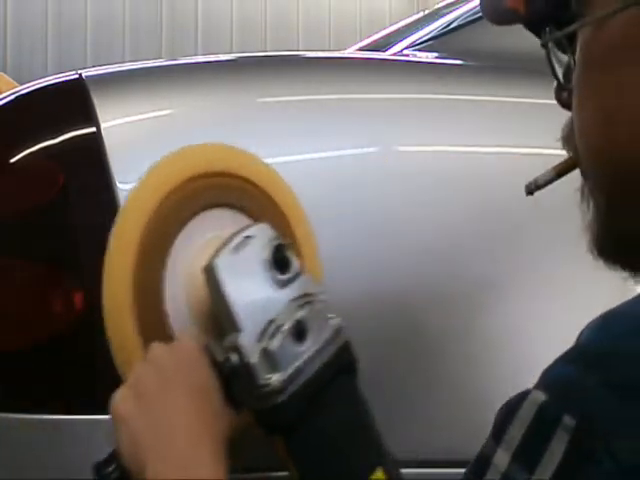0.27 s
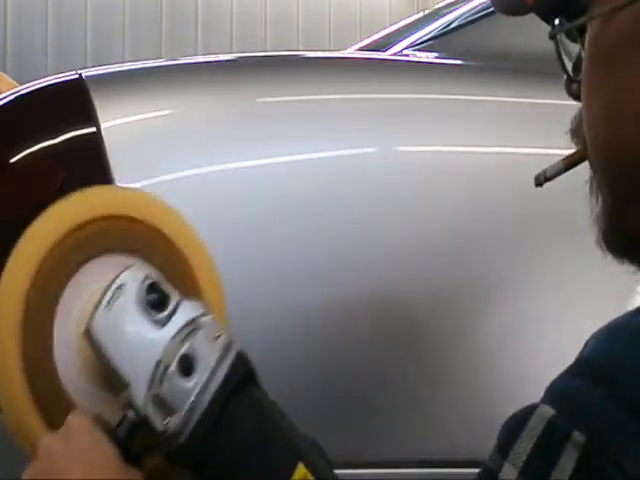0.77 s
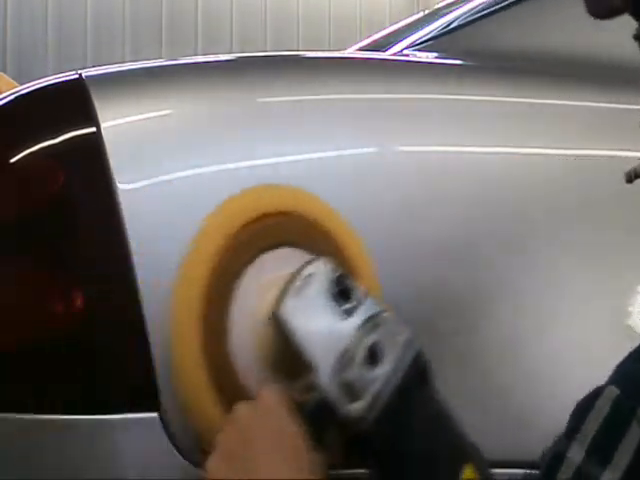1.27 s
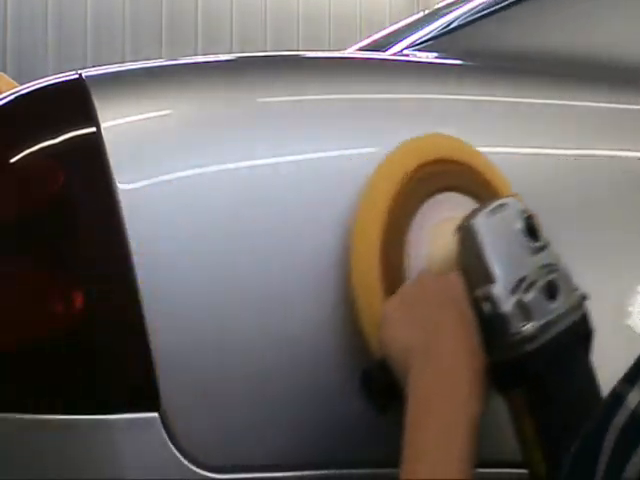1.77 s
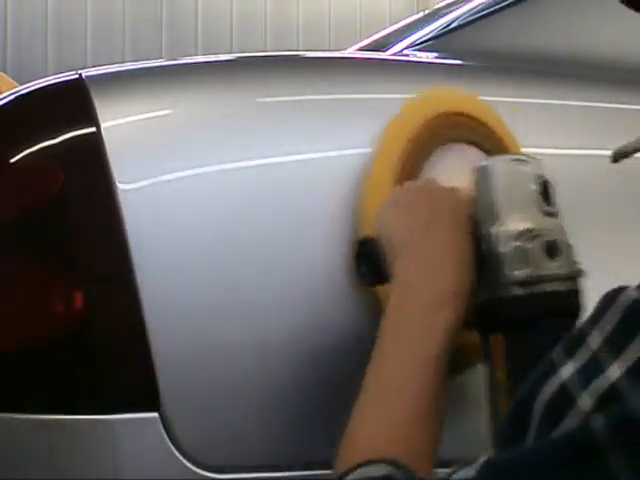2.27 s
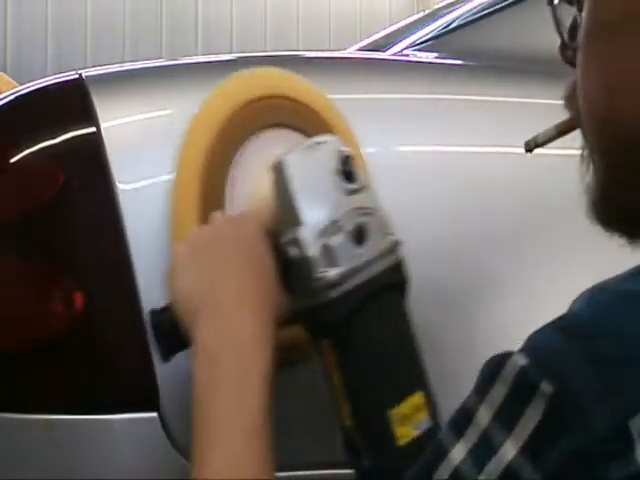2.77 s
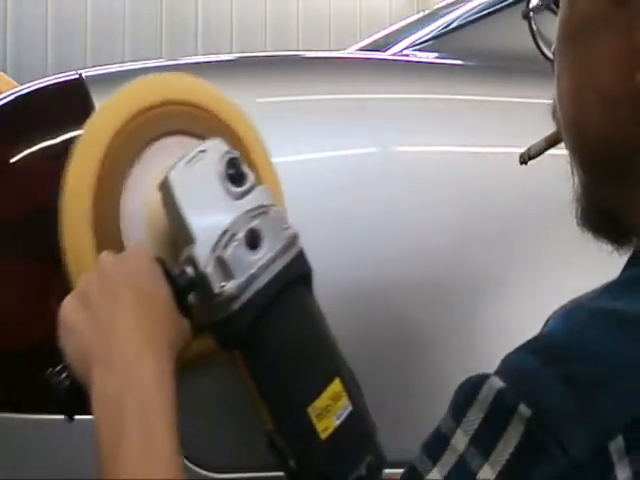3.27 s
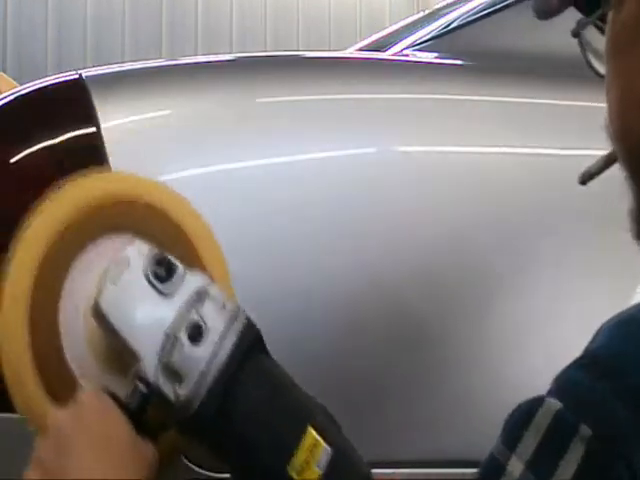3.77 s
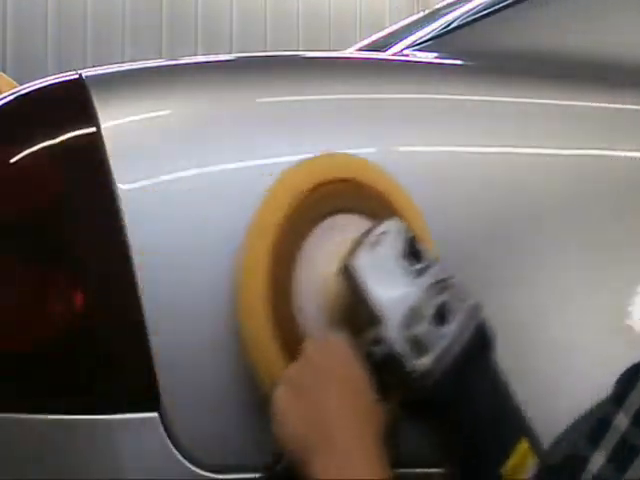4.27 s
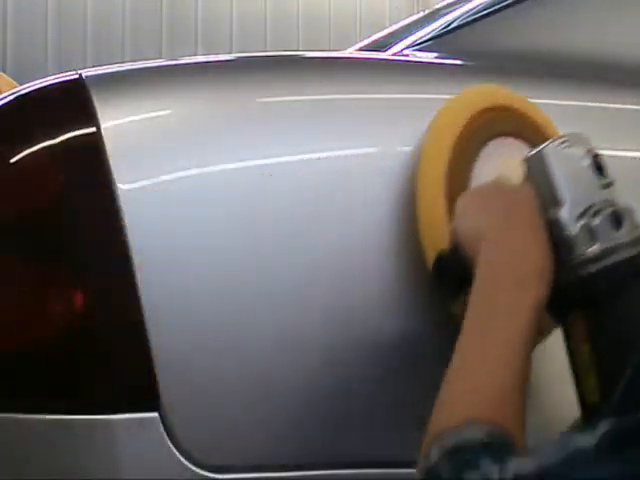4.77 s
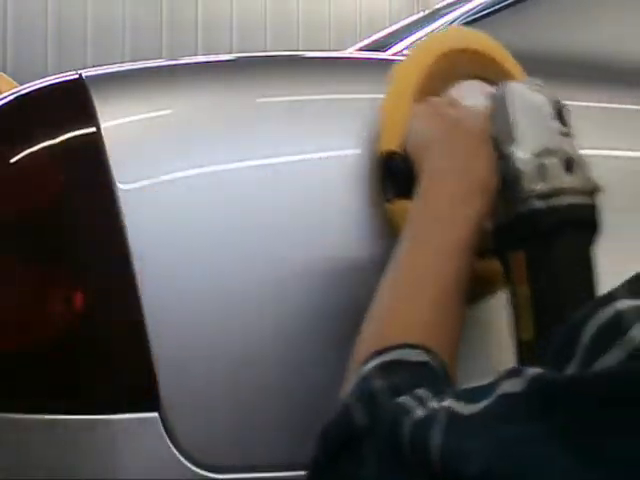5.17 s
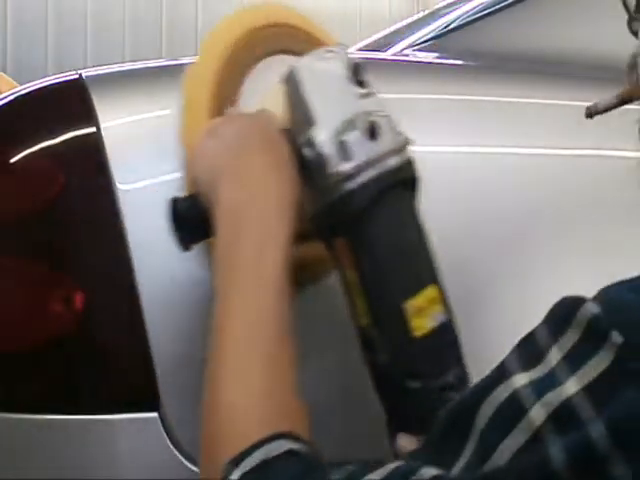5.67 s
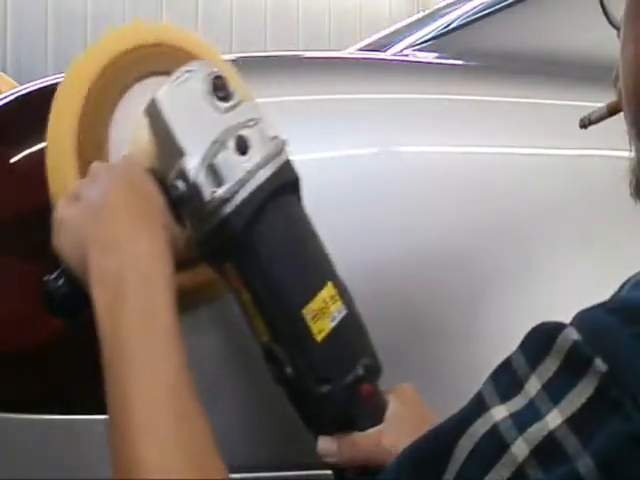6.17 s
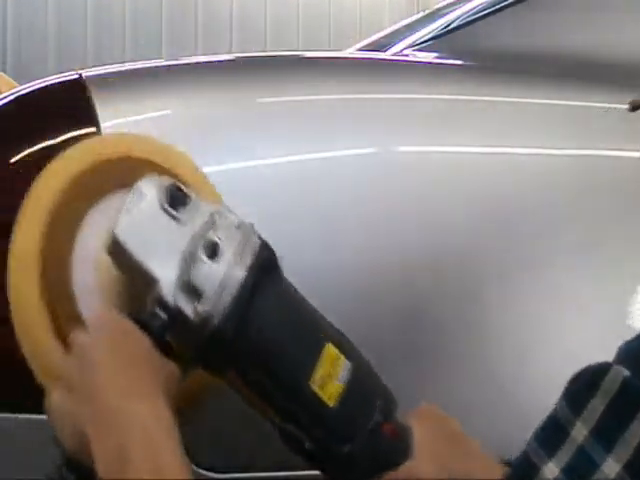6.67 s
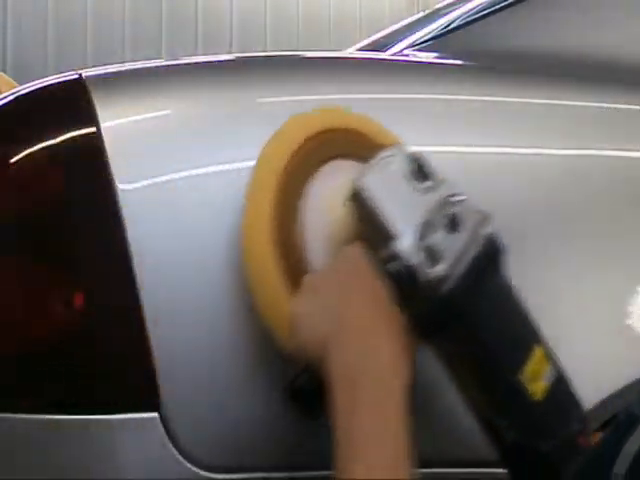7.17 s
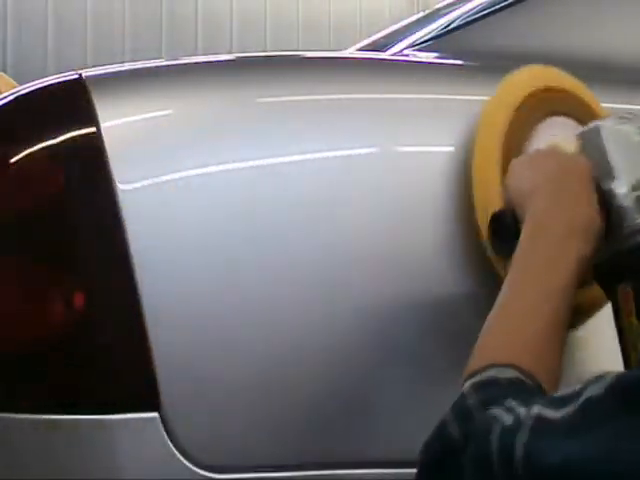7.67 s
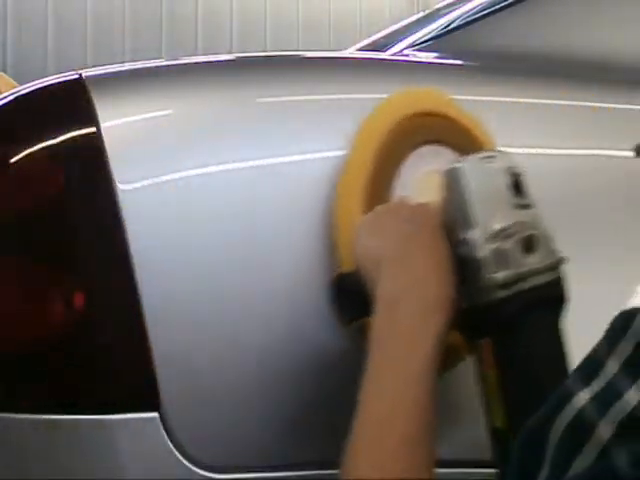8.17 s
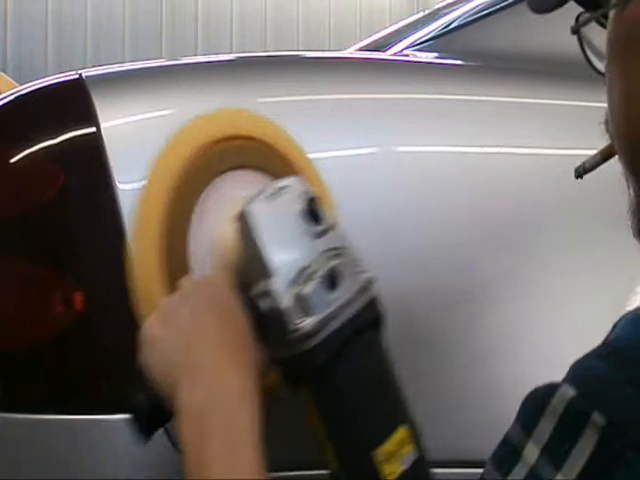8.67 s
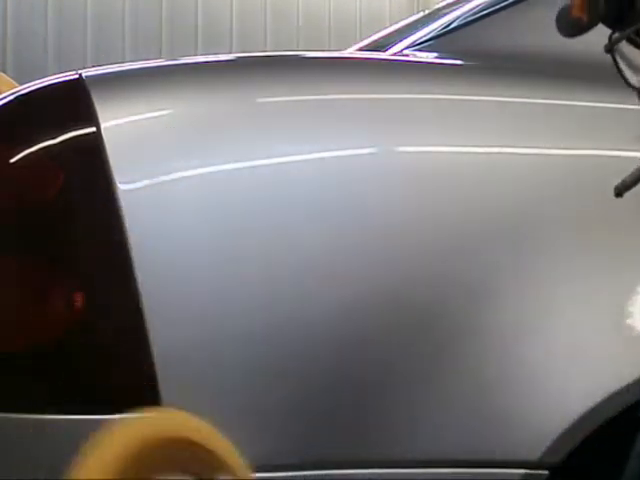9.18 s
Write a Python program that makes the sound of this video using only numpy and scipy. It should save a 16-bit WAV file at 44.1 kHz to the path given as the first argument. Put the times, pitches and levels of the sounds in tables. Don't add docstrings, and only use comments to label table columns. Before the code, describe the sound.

A power polisher buzzes continuously near the microphone: a piercing, slightly gritty whine with higher overtones, a fast rattling gear flutter, airy fan rush and low pad rumble. Sweeping motions shift its tone and loudness gently, with brief flares from the garage's reflections. After about nine seconds power is cut and the motor tone drops away, still spinning as the sound ends.

```python
import sys
import numpy as np
from scipy import signal
from scipy.fft import rfft, irfft, next_fast_len
from scipy.io import wavfile
from scipy.ndimage import uniform_filter1d, map_coordinates

SR = 44100
rng = np.random.default_rng(int(sys.argv[2]) if len(sys.argv) > 2 else 0)


def linear_from_db(decibels):
    return 10 ** (np.asarray(decibels, float) / 20)


def output_pcm(signal):
    pcm = np.clip(np.atleast_2d(signal).T, -1, 1) * 32767
    wavfile.write(sys.argv[1], SR, np.round(pcm).astype(np.int16))


N = 415863

PINION_TEETH, CROWN_TEETH = 6, 53
MESH_ORDERS = (1, 2, 3, 4, 6, 5)
SWITCH_OFF_S = 8.97
USUAL_MESH_HZ, SPEED_SPAN_HZ = 1265, 50
DRAG_HZ_PER_S, SLACK_HZ, SLACK_S = 460, 56, 0.08

# (time [s], tooth mesh [Hz])
LOADED_SPEED = [(0, 1278), (.62, 1268), (1.25, 1283), (1.5, 1305), (2.12, 1313), (2.5, 1281), (3.25, 1241),
                (3.88, 1255), (4.38, 1279), (5.12, 1292), (5.5, 1238), (6.3, 1204), (7.0, 1236),
                (7.4, 1276), (7.85, 1318), (8.25, 1277), (8.75, 1238), (8.95, 1247)]
# (time [s], head turned away [0-1], nearness [dB], pad lean [0-1], head resonance [Hz])
HANDS = [(0, 0.1, 0.7, 0.74, 2380), (.9, .2, 0.65, 0.1, 2520), (1.3, 0.1, -0.2, 0.48, 2700),
         (1.7, 0.63, -1.4, .6, 2600), (2.25, 0.8, 0.6, 0.79, 2710), (2.6, 0.12, 0.5, .95, 2400),
         (3.5, 0.26, 0.8, .05, 2320), (4.2, 0.21, .6, 0.48, 2700), (4.75, 1, -.6, 0.9, 2610),
         (5.1, 0.7, 1.1, 0.88, 2490), (5.7, 0.12, -1.1, .5, 2270), (6.4, 0.18, -1.5, .1, 2170),
         (7.0, 0.28, -.4, .05, 2620), (7.3, 0.2, -0.1, 0.53, 2700), (7.75, 1.1, 0.1, 0.68, 2620),
         (8.3, 0.17, 1.5, 0.91, 2500), (8.9, 0.09, 0.3, 0.32, 2521), (9.43, 0.5, -1.3, .4, 2430)]
# (level [dB], [dB per speed span], turned away [dB], switch opening [dB], coasting [dB per s])
MESH_LEVELS = [
    (-30, -0.2, -8.5, -10, 4),
    (-31.5, -1.7, -0.4, 7.5, -12),
    (-39, 5, -2.5, -9, 6),
    (-41.5, -0.5, -11.5, -5, 20),
    (-44, -0.5, 3.8, -4, 20),
    (-44, -1, 6.5, 1.5, -14),
]
# (time [s], mesh
# order, rise [dB], length [s])
MESH_FLARES = [(.48, 1, 4, 0.082), (2.75, 1, 3.5, .3), (2.43, 1, 6.5, .06), (5.39, 2, 5, .08),
               (5.555, 1, 6, 0.11), (6.3, 1, 4, .35), (8.38, 1, 1.5, 0.11), (.5, 2, 1, 0.11),
               (.96, 2, 3, 0.099), (1.42, 2, 6, 0.11), (1.88, 2, 7, 0.056), (2.24, 2, 11, 0.18),
               (2.89, 2, 6, .08), (4.15, 2, 9, .11), (4.75, 2, 10, .07), (5.046, 2, 6.5, 0.096),
               (5.62, 2, 11, .27), (6.1, 2, 7.5, 0.16), (6.751, 2, 4, 0.33), (7.75, 2, 4.5, 0.077),
               (8.297, 2, 7, .13), (9.32, 2, 4, .04), (.35, 3, 3, 0.23), (1.0, 3, 5.5, 0.22),
               (4.83, 3, 6, .12), (3.35, 4, 10, 0.99), (7.0, 4, 9, 0.41), (8.62, 4, 5, .28),
               (9.15, 6, 8, .045), (9.36, 6, 12.5, .055)]
# (mesh order, level [dB])
MINOR_MESH = [(7, -54), (8, -56), (9, -65), (10, -60), (11, -57), (12, -57)]
# (turn order, level [dB])
SHAFT_TONES = [(2, -55), (7, -54), (10, -37.5), (11, -46), (26, -50), (35, -67), (53, -59)]
# (crown order, level under first mesh order [dB], [dB per speed span])
CROWN_BEATS = [(52, -7, -5), (51, -8.5, 1.5), (50, -10.5, 5), (35, -11.5, .3), (34, -11.5, 3.5),
               (33, -14, .3)]
# (frequency [Hz], density [dB per Hz])
HOUSING_COLOUR = [(250, -29), (500, -11), (850, -7), (1240, -6.5), (1420, -17.5), (1800, -10.5), (2400, -6),
                  (3150, -10.5), (3950, -9), (4580, -15), (5090, -11.5), (7600, -18.5), (8300, -34.5),
                  (11000, -43)]
# (frequency [Hz], density [dB per Hz])
BRUSH_COLOUR = [(7000, -24), (8300, 0), (10300, -3.5), (11300, -2.5), (13100, -5.5), (13900, 2),
                (15000, -0.5), (15750, 0)]
# (frequency [Hz], width [Hz], level [dB])
KNOCK_MODES = [(816, 270, -9.5), (1144, 68, 1), (2006, 110, -1)]
ZONE_HZ = [750, 2400, 5200, 11500, 14000]
# (level [dB per speed span], turned away [dB], coasting [dB])
ZONE_SWELLS = [
    (1.7, 1.5, 2.5),
    (0.8, -5, -3.5),
    (0.9, 3.5, -1.8),
    (1, -2, 1.5),
    (-0.5, -6, 3.5),
]
# (frequency [Hz], [Hz per speed span], turned away [Hz], depth [dB], width [Hz])
PAINT_DIP = (12750, -170, -450, 6.3, 330)
# (mesh order, level [dB])
BRUSH_RIDGES = [(11, 4.5), (12, 3)]
# (frequency [Hz], density [dB per Hz])
FOAM_COLOUR = [(15, -41), (25, -14), (32, -30), (80, -2), (118, -7), (162, -8), (205, -1.5), (275, -2.5),
               (330, -3), (430, -8), (730, -120)]
# (frequency [Hz], level [dB])
COIL_HUM = [(120, -53.5), (240, -49)]
# (time [s], low edge [Hz], high edge [Hz], level [dB])
SIDE_BURSTS = [(0.398, 5600.0, 6980.0, -35.0), (1.445, 10940.0, 12490.0, -46.5),
               (1.837, 4490, 5770.0, -36.0), (1.837, 8870.0, 10340.0, -45.0), (2.0, 4050.0, 5190, -33.0),
               (2.212, 12900, 14630, -47.0), (2.696, 7480, 9810, -41.0), (3.37, 5130, 6360, -34.0),
               (3.393, 12320.0, 13870.0, -46.0), (3.532, 4486, 5870, -32.0), (4.066, 4135, 5350, -34.0),
               (4.066, 6120.0, 7600, -36.0), (4.438, 6780, 8380, -40.0), (4.45, 12200, 15250.0, -42.0),
               (4.717, 4190, 5346, -33), (4.717, 12320.0, 13900, -47.0), (5.3, 9640, 11000, -44),
               (5.3, 11600, 13180.0, -47.0), (5.37, 9560.0, 11110.0, -46.0),
               (5.413, 10940.0, 12490.0, -47.0), (7.944, 13810, 15930.0, -44.0),
               (8.943, 10980, 13180.0, -43.0), (8.943, 13800, 15250.0, -37.0)]


def unit(x):
    return x / np.sqrt(np.mean(x ** 2) + 1e-20)


def curves(rows):
    s, *cols = np.transpose(rows)
    return [np.interp(np.arange(N) / SR, s, c) for c in cols]


def wobble(rate):
    at = np.arange(0, N + 32, 32)
    knots = rng.standard_normal(int(N * rate / SR) + 4)
    return np.interp(np.arange(N), at, map_coordinates(knots, [at * rate / SR]))


def coloured(x, spectrum):
    m = next_fast_len(N + 8192)
    hz, db = np.transpose(spectrum)
    log_hz = np.log(np.fft.rfftfreq(m, 1 / SR) + 1)
    gain = linear_from_db(np.interp(log_hz, np.log(hz), db, left=-120, right=-120))
    return unit(irfft(rfft(x, m) * gain, m)[:N])


def flaws(turns, count, fall_db, drift):
    size = 1 << 15
    k = np.arange(1, count + 1)
    spectra = np.zeros((3, size // 2 + 1), complex)
    random = rng.standard_normal((3, count)) + 1j * rng.standard_normal((3, count))
    spectra[:, k] = linear_from_db(-fall_db * np.log2(k)) * random
    at = (turns % 1 * size).astype(int)
    out = np.zeros(N)
    for i, wave in enumerate(irfft(spectra)):
        out += ((i == 0) + drift * wobble(1.515)) * wave[at]
    return unit(out)


def power():
    return 1 / (1 + np.exp(np.clip((np.arange(N) / SR - SWITCH_OFF_S) / 0.01, -50, 50)))


def speed():
    coast_s = np.clip(np.arange(N) / SR - LOADED_SPEED[-1][0], 0, None)
    slack_hz = SLACK_HZ * (1 - np.exp(-coast_s / SLACK_S))
    return curves(LOADED_SPEED)[0] - DRAG_HZ_PER_S * coast_s - slack_hz


def ease():
    return (curves(LOADED_SPEED)[0] - USUAL_MESH_HZ) / SPEED_SPAN_HZ


def mesh_levels(turned):
    t = np.arange(N) / SR
    levels_db = {}
    for order, (db, fast_db, away_db, off_db, coast_db) in zip(MESH_ORDERS, MESH_LEVELS):
        coasting_db = off_db + coast_db * (t - SWITCH_OFF_S) + 2.5 * wobble(24)
        running_db = db + fast_db * ease() + away_db * turned + 1.78 * wobble(7)
        levels_db[order] = running_db + (1 - power()) * coasting_db
    for s, order, db, length_s in MESH_FLARES:
        near = slice(max(round((s - 3 * length_s) * SR), 0), round((s + 3 * length_s) * SR))
        levels_db[order][near] += db * np.exp(-((t[near] - s) / length_s) ** 2)
    return list(levels_db.values())


def whine(teeth, levels_db):
    load = 0.57 + 0.34 * power()
    turns = teeth / CROWN_TEETH
    phase = 2 * np.pi * teeth
    play = 0.024 * wobble(60) + 0.089 * wobble(12)
    swings = [0.34, 0.36, 0.73, 0.45, 0.57, 0.5]
    slips = [0.25, 0.38, 0.5, 0.59, 0.3, 0.53]
    out = np.zeros(N)
    for order, db, swing, slip in zip(MESH_ORDERS, levels_db, swings, slips):
        size = 1.5 + swing * load * flaws(turns, count=12, fall_db=3.0, drift=0.83)
        size += 0.29 / order * power() * np.cos(2 * np.pi * turns - 1)
        lag = slip * load * flaws(turns, count=12, fall_db=7.0, drift=0.65)
        out += linear_from_db(db + 1.5) * size * np.sin(order * (phase + load * play) + lag)
    slack_db = -9 * (1 - power())
    for tones, per in ((MINOR_MESH, 1), (SHAFT_TONES, PINION_TEETH)):
        for order, db in tones:
            level = linear_from_db(db + 4.5 + slack_db + 4.1 * wobble(4))
            out += level * np.sin(order / per * (phase + play) + 0.7 * wobble(45))
    return out


def beats(teeth, first_db):
    fast = ease()
    out = np.zeros(N)
    for order, db, fast_db in CROWN_BEATS:
        out += linear_from_db(db + fast_db * fast) * np.sin(order / CROWN_TEETH * 2 * np.pi * teeth)
    return linear_from_db(first_db + 3.5 + 1.5 * wobble(3.02)) * power() * out


def grind(teeth):
    pinion_turns, crown_turns = teeth / PINION_TEETH, teeth / CROWN_TEETH
    mains = np.sin(2 * np.pi * COIL_HUM[0][0] * np.arange(N) / SR) * power()
    turn = flaws(crown_turns, count=8, fall_db=1.5, drift=0.31)
    air = (1 + 0.045 * mains + 0.051 * turn) * rng.standard_normal(N)
    pinion = flaws(pinion_turns, count=48, fall_db=0, drift=1.7)
    crown = flaws(crown_turns, count=125, fall_db=-2.0, drift=0.8) * (0.29 + 0.74 * power())
    body = linear_from_db(-19.5) * coloured(air + 0.06 * pinion + 0.2 * crown, HOUSING_COLOUR)
    shake = 1 + 0.05 * mains + 0.069 * np.sin(2 * np.pi * pinion_turns)
    sparks = shake * rng.standard_normal(N)
    bars = 0.22 + 0.6 * (1 - power())
    sparks += bars * flaws(pinion_turns, count=100, fall_db=1.5, drift=1.7)
    return body + linear_from_db(-35.5) * coloured(sparks, BRUSH_COLOUR)


def knock(teeth, mesh_hz, turned, lean):
    turns = teeth / CROWN_TEETH
    blows = np.diff(np.floor(turns), prepend=0)
    rattle = 0.022 * np.exp(1.6 * (np.cos(2 * np.pi * turns - 1) - 1)) * rng.standard_normal(N)
    force_db = 17 - 0.05 * (mesh_hz - 1260) - 8 * turned + 8 * lean + 1.5 * wobble(4)
    force = (1.9 * blows + rattle) * linear_from_db(force_db) * power()
    m = next_fast_len(N + 8192)
    f = np.fft.rfftfreq(m, 1 / SR)
    modes = np.zeros(len(f), complex)
    for k, (hz, wide_hz, db) in enumerate(KNOCK_MODES):
        damping = 1j * f * wide_hz
        modes += (-1) ** k * linear_from_db(db) * damping / (hz * hz - f * f + damping)
    greased = 1 / (1 + 1j * f / 2500) ** 2
    late = np.exp(1j * np.pi * 2.2e-5 * np.clip(1302 - f, 0, None) ** 2)
    return irfft(rfft(force, m) * modes * late * greased, m)[:N]


def facing(x, mesh_hz, turned, near_db, head_hz, patchy_db):
    hz, t, z = signal.stft(x, SR, nperseg=512)
    at = np.minimum((t * SR).astype(int), N - 1)
    fast, away, on = ease()[at], turned[at], power()[at]

    def bump(centre_hz, wide_hz):
        return np.exp(-((hz[:, None] - centre_hz) / wide_hz) ** 2)

    zones_db = np.array(ZONE_SWELLS) @ [fast, away - away.mean(), 1 - on] + near_db[at]
    share = np.array([np.interp(np.log(hz + 1), np.log(ZONE_HZ), row) for row in np.eye(len(ZONE_SWELLS))])
    patches = uniform_filter1d(uniform_filter1d(rng.standard_normal(z.shape), 5, 0), 40, 1)
    shape_db = 5.3 * on * bump(head_hz[at], 215)
    dip_hz, fast_hz, away_hz, dip_db, wide_hz = PAINT_DIP
    shape_db -= dip_db * bump(dip_hz + fast_hz * fast + away_hz * away, wide_hz)
    for order, db in BRUSH_RIDGES:
        shape_db += db * (1 - away) * bump(order * mesh_hz[at], 220)
    gain = linear_from_db(share.T @ zones_db + shape_db + patchy_db * unit(patches))
    return signal.istft(z * gain, SR, nperseg=512)[1][:N]


def pad(teeth, turned, lean):
    t = np.arange(N) / SR
    rumble_db = -49.5 + 2 * turned
    rumble = linear_from_db(rumble_db + 6.5 + 2.1 * wobble(2.91)) * coloured(rng.standard_normal(N), FOAM_COLOUR)
    unbalance_db = -59.5 + 19.5 * lean
    shaft = linear_from_db(unbalance_db + 2.0 + 2.5 * wobble(5)) * np.sin(2 * np.pi * teeth / PINION_TEETH)
    hum = np.zeros(N)
    for hz, db in COIL_HUM:
        hum += linear_from_db(db + 1 + 3.0 * wobble(2.28)) * np.sin(2 * np.pi * hz * t)
    return rumble + shaft + hum * power()


def side_bursts():
    side, size = np.zeros(N + SR), 2048
    f = np.fft.rfftfreq(size, 1 / SR)
    for s, low_hz, high_hz, db in SIDE_BURSTS:
        band = (f > low_hz) & (f < high_hz)
        burst = irfft(rfft(rng.standard_normal(size)) * band)
        start = round(s * SR) - size // 2
        side[start:start + size] += linear_from_db(db + 0.5) * unit(burst) * np.hanning(size)
    return side[:N] * np.array([[1], [-1]])


def scene():
    mesh_hz = speed()
    teeth = np.cumsum(mesh_hz) / SR
    turned, near_db, lean, head_hz = curves(HANDS)
    levels_db = mesh_levels(turned)
    gears = whine(teeth, levels_db) + beats(teeth, levels_db[0])
    noise = grind(teeth) + knock(teeth, mesh_hz, turned, lean)
    housing = facing(noise, mesh_hz, turned, near_db, head_hz, patchy_db=1.5)
    tool = gears + housing + pad(teeth, turned, lean)
    return np.array([tool, tool])


def low_pass(x):
    return signal.sosfilt(signal.butter(12, 16420, fs=SR, output="sos"), x)


def record(dry):
    m = next_fast_len(N)
    passed = np.fft.rfftfreq(m, 1 / SR) < 15740
    mix = irfft(rfft(dry + side_bursts(), m) * passed, m)[:, :N] - 0.0055
    return low_pass(mix)


dry = scene()
out = record(dry)
output_pcm(out)
```